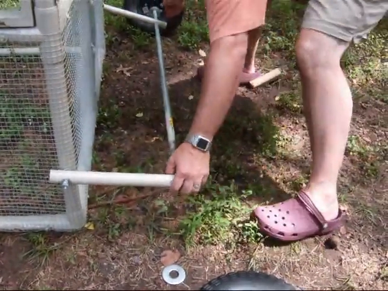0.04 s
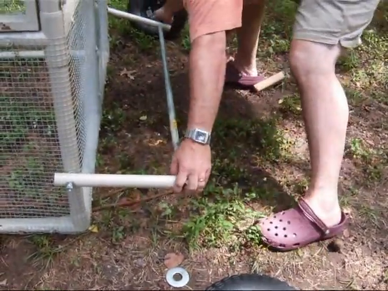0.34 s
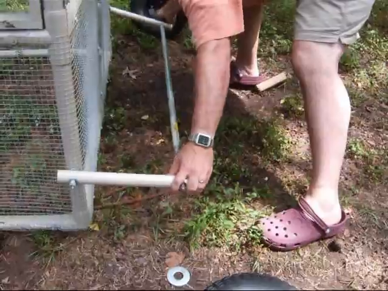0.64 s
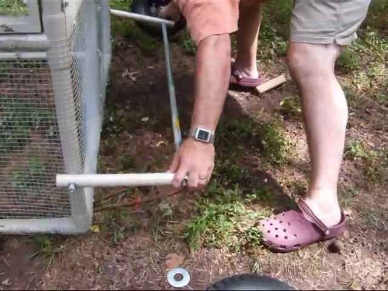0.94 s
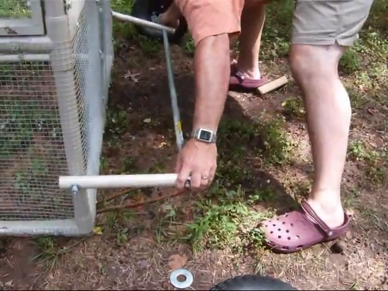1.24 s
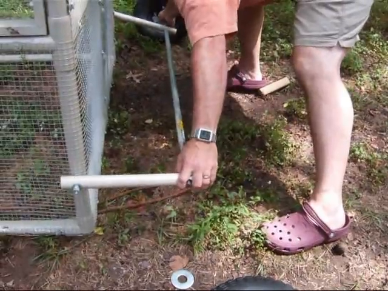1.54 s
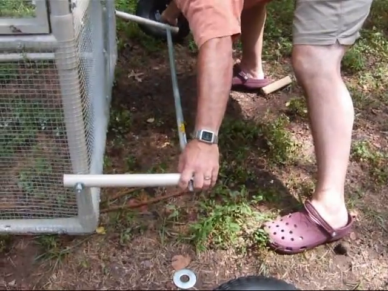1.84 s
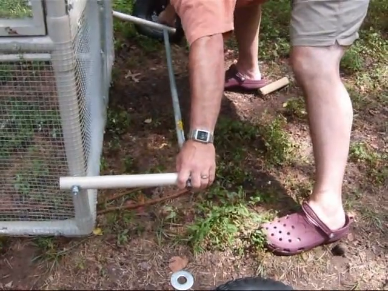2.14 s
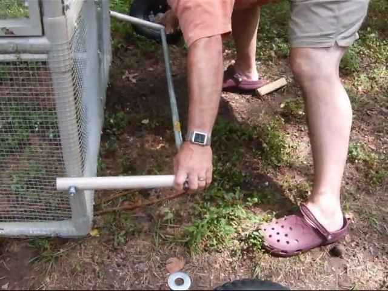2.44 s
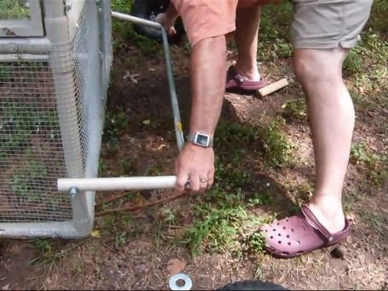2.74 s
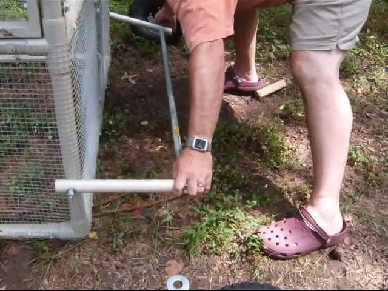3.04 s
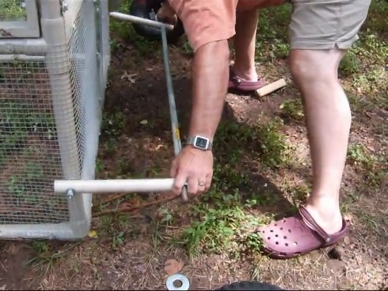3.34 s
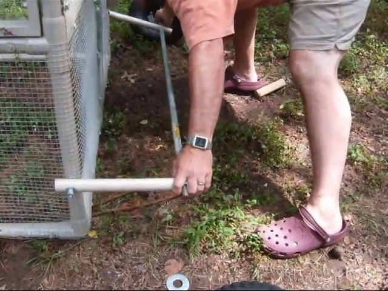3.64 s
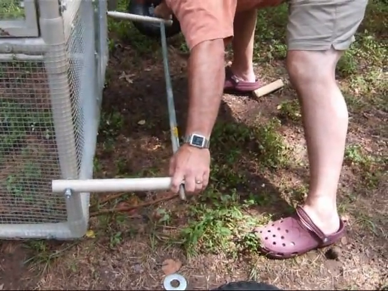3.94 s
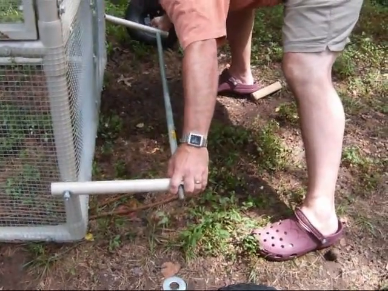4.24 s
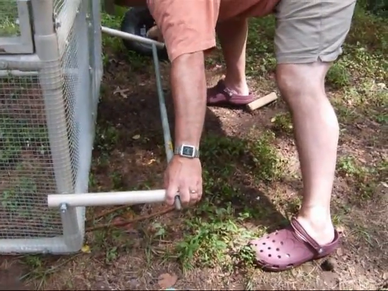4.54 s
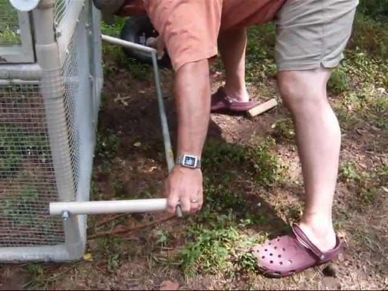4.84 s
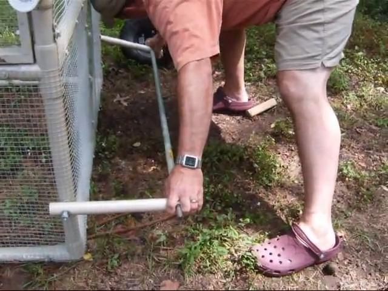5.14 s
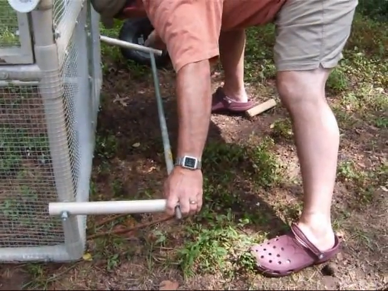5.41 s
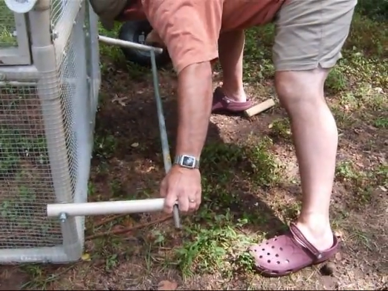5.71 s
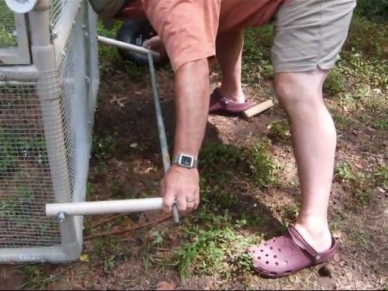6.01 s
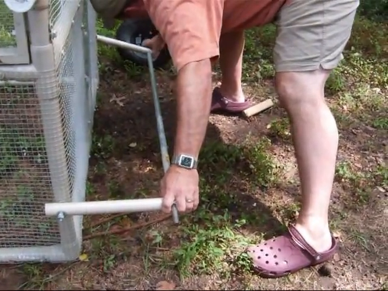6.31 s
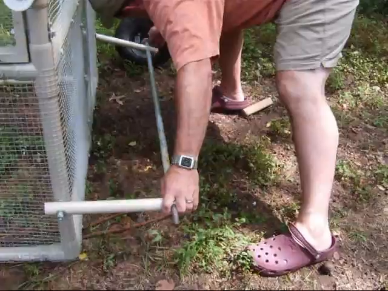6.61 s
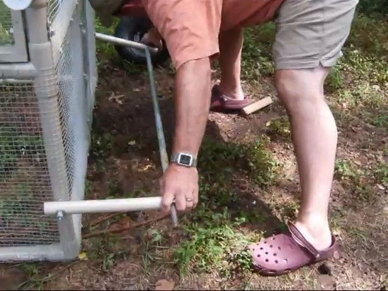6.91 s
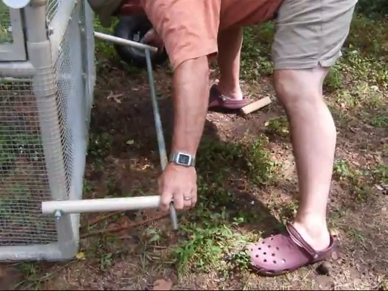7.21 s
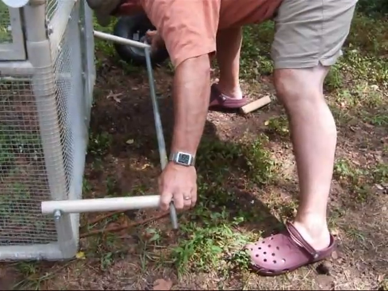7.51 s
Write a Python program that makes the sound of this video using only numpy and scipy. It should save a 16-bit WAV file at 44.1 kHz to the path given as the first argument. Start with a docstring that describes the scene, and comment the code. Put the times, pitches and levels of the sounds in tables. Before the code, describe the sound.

A metal rod slides through a plastic pipe in short pushes, heard in the foreground over a high chorus of cicadas in the trees. An early flurry of hollow knocks, sharp clicks and thin pings comes with low thumps and rattles from a wire-mesh frame. Scattered taps and grainy, high-pitched scraping follow, while one nearer, pulsing cicada gradually drops away and the distant hiss carries on.

```python
"""Outdoors, one microphone on a plastic pipe on a wire-mesh frame, cicadas in the trees around.
First a far chorus hisses and a nearer insect throbs. Half a second in, the frame stirs; then a steel
rod is worked by hand through the pipe. It rubs, knocks the wall and rings at one high note until the
next touch stops it, while the frame thumps and rattles. After two seconds the knocks come more
sparsely, and over the last three the near cicada fades away behind the rod."""
import sys
import numpy as np
from scipy.fft import rfft, irfft, next_fast_len
from scipy.io import wavfile
from scipy.ndimage import map_coordinates

SR = 44100
rng = np.random.default_rng(int(sys.argv[2]) if len(sys.argv) > 2 else 0)


def transcribe(u):
    """Save the signal u as a 16-bit wav file named by the first command-line argument.

    u: samples, shape (n,) or (channels, n), limited to [-1, 1]; the rate is SR.
    q: integer samples, one column per channel.
    """
    v = np.clip(np.atleast_2d(u).T, -1, 1)
    q = np.round(v * 32767).astype(np.int16)
    wavfile.write(sys.argv[1], SR, q)


N = 333479
TIME = np.arange(N) / SR
ROD_HZ = 4800  # the rod's one strong mode

# spectra of the open air and the far cicada chorus: f/Hz, relative level/dB
AIR_SPECTRUM = [(20, -4), (60, 6.5), (150, -1), (400, -5), (800, -1), (1400, -6.5), (2200, -8.5),
                (4000, -16), (8000, -23)]
CHORUS_SPECTRUM = [(1180, -41.5), (2000, -24), (2280, -19.5), (2460, -19), (3160, -13.5), (4110, -8.5),
                   (4240, -10.5), (4770, -2.5), (5150, -4.5), (6200, 1.5), (7110, -3.5), (7550, -5),
                   (7960, -14), (8300, -48), (10800, -57.5), (18300, -120)]
# spectra of the shaking mesh and the dragging rod: f/Hz, relative level/dB
MESH_SPECTRUM = [(30, -35), (85, -0.5), (130, -7.5), (230, -3), (400, 2), (600, -2.5), (850, 0.5),
                 (1400, -11.5), (2000, -4), (2800, -15), (4500, -6.5), (8000, -34)]
RUB_SPECTRUM = [(30, -38.5), (85, 1.5), (130, -8.5), (240, 0.5), (430, 4), (600, -4), (830, -4), (1100, -5),
                (1450, -12), (2000, -7.5), (3500, -23), (8000, -42.5)]
# resonances of the near cicada, frame, pipe edge and pipe: f/Hz, width/Hz, relative level/dB
CICADA_MODES = [(5610, 220, -9.5), (6210, 390, -2.5), (6833, 380, 1), (7110, 89, -2), (7307, 220, -8),
                (7700, 37, -15)]
FRAME_MODES = [(88, 30, -34.5), (190, 14, 1.5), (238.4, 39, 8), (395, 230, -20.5)]
EDGE_MODES = [(2160, 260, -6.5), (3770, 280, 3.5), (6470, 640, 8)]
PIPE_MODES = [(453, 160, -16.5), (790, 160, 4), (970, 82, -3.5), (1430, 110, -14.5), (1760, 160, -7),
              (2214, 220, -13), (2650, 38, -18.5), (3125, 55, -5), (3160, 64, -17)]
# cicadas in the trees: t/s, far chorus base level/dB, near insect base level/dB
CICADA_LEVELS = [(0, -30.7, -30), (2.4, -30.7, -31.3), (4.2, -29.7, -31.5), (5.3, -29.6, -34),
                 (6.2, -29.8, -39), (7.56, -32.2, -44)]
# the mesh shifts and rattles out: t/s, relative level/dB, bass t60/s
MESH_RATTLES = [(0.55, -34, 0.9), (0.791, -30.5, 0.66), (1.135, -26.5, 1), (1.432, -27.5, 0.36),
                (1.95, -33.5, 0.98), (2.208, -27, 0.68), (2.411, -31, 0.46), (2.62, -31.5, 0.3),
                (2.767, -27.5, 0.83), (5.137, -28, 0.84), (5.993, -28.5, 0.21), (6.484, -25.5, 0.6),
                (7.091, -30.5, 0.49)]
# the frame takes a push: t/s, peak level/dB
FRAME_THUMPS = [(0.759, -15), (1.053, -20.5), (1.125, -14.5), (1.733, -25), (1.935, -23.5), (2.784, -20.5),
                (2.836, -26), (3.321, -19), (4.527, -27), (7.176, -30.5)]
# the hand slides the rod along: t/s, length/s, relative rubbing level/dB, singing level/dB
ROD_PUSHES = [(0.718, 0.66, -35.5, -35), (1.794, 0.32, -40, -42), (2.96, 0.23, -74, -36),
              (3.39, 0.41, -42, -38), (3.895, .25, -48, -46), (4.155, 0.31, -44.5, -41.5),
              (4.58, 0.19, -41, -37), (5.727, .08, -40, -40), (5.993, 0.19, -49, -47.5),
              (6.5, 0.38, -66, -39.5), (7.016, 0.37, -44, -40.5)]
# hard edges catch and scrape: t/s, peak level/dB, t60/s, tilt/(dB per octave)
EDGE_CLICKS = [(0.784, -7, 0.08, 7), (0.9605, -5.5, .005, 5), (1.0052, -10.5, .004, 10),
               (1.142, -21, .07, -5.5), (1.154, -20, 0.0058, 19), (1.207, -8.5, 0.074, -6.5),
               (2.765, -4, 0.05, -3), (3.327, -19, 0.083, 18), (5.136, -16, 0.088, -5),
               (6.483, -13.5, 0.089, -5.5), (7.347, -17.5, 0.092, -5)]
# the rod meets the pipe wall: t/s, peak level/dB
PIPE_KNOCKS = [(0.707, -16), (0.765, -15), (0.786, -17.5), (0.846, -17.5), (0.917, -23.5), (0.96, -17),
               (1.054, -21.5), (1.129, -9), (1.153, -14.5), (1.617, -19), (1.735, -18.5), (1.94, -18.5),
               (1.968, -16), (2.013, -19), (3.325, -16.5), (3.601, -23.5), (4.111, -19), (4.16, -21),
               (4.383, -24.5), (4.705, -19.5), (4.818, -19), (5.633, -20), (5.713, -21), (6.041, -24.5),
               (6.758, -20.5), (6.942, -23.5), (7.035, -27), (7.537, -23.5)]
# the rod rings: t/s, relative level/dB, free time until the next touch/s
ROD_RINGS = [(0.805, -12, 0.016), (0.962, -14, 0.0069), (1.005, -15.5, 0.2), (1.135, -19, 0.033),
             (1.205, -18.5, 0.021), (1.332, -23.5, 0.3), (1.616, -15, .003), (1.742, -19, 0.029),
             (1.945, -18, 0.1), (2.768, -26, 0.058), (2.95, -15.5, 0.03), (3.33, -21, 0.15),
             (3.424, -21, 0.017), (3.629, -19, 0.068), (4.112, -18.5, 0.072), (4.388, -21, 0.037),
             (5.635, -10.5, .001), (5.714, -22, 0.035), (6.78, -31, 0.042), (6.943, -21.5, 0.014),
             (7.157, -24, 0.016), (7.52, -27.5, 0.02)]


def amp(db):
    """Decibels to gain."""
    return 10 ** (np.asarray(db) / 20)


def unit(x):
    """x at rms 1."""
    return x / np.sqrt(np.mean(x ** 2) + 1e-20)


def wobble(rate):
    """A smooth random curve, rate knots a second."""
    return map_coordinates(rng.standard_normal(2048), [TIME * rate], mode="wrap")


def filtered(x, response):
    """x through a frequency response."""
    size = next_fast_len(len(x) + 8192)
    return irfft(rfft(x, size) * response(np.fft.rfftfreq(size, 1 / SR)), size)[:len(x)]


def colour(points):
    """The response through (f/Hz, level/dB) points on a log axis."""
    f, db = np.transpose(points)
    return lambda hz: amp(np.interp(np.log(hz + 1), np.log(f), db))


def body(modes):
    """The causal response of a set of resonances."""
    return lambda f: sum(amp(db) * 1j * f * width / (hz * hz - f * f + 1j * f * width)
                         for hz, width, db in modes)


def noise(spectrum):
    """Noise of rms 1 with the given spectrum."""
    return unit(filtered(rng.standard_normal(N), colour(spectrum)))


def narrow_noise(hz, width_hz):
    """Noise of rms 1 in one steep resonance."""
    return unit(filtered(rng.standard_normal(N), lambda f: body([(hz, width_hz, 0)])(f) ** 2))


def grit(size, spread):
    """A stream of tiny contacts of unequal strength, rms 1."""
    contacts = rng.standard_normal(size)
    log_strength = spread * np.repeat(rng.standard_normal(size // 32 + 1), 32)[:size]
    return unit(contacts * np.exp(log_strength))


def add(track, s, sound):
    """Mix a sound into the track at time s."""
    start = round(s * SR)
    track[start:start + len(sound)] += sound[:N - start]


def stroke(s, length, rise_s=0.02, fade_db_per_s=100):
    """The gain of one push of the hand: it rises, holds and runs out."""
    rise = 1 - np.exp(-np.maximum(TIME - s, 0) / rise_s)
    return rise * amp(-fade_db_per_s * np.maximum(TIME - s - length, 0))


def scattered(x, latest_s=0.035, count=10):
    """Trunks and ground send weak late copies to the microphone, rippling the spectrum; rms 1."""
    delays = rng.uniform(0.003, latest_s, count)
    gains = 0.11 * rng.choice([-1, 1], count)
    return unit(x + sum(gain * np.roll(x, int(delay * SR)) for delay, gain in zip(delays, gains)))


def cicadas(throb_hz=7.79, trill_db=-28.5, trill_follows=0.52):
    """Far off in the trees a chorus hisses; nearer, one insect's body buzzes in throbs over a thin note."""
    times, far_levels, near_levels = np.transpose(CICADA_LEVELS)
    far_db, near_db = np.interp(TIME, times, far_levels), np.interp(TIME, times, near_levels)
    phase = 2 * np.pi * throb_hz * (TIME - 0.149)
    throb_db = -3 * (np.sin(phase) + 0.5 * np.sin(2 * phase)) - 0.5  # slow swell, quick drop
    band = lambda hz: (1 - 1 / (1 + (hz / 4500) ** 12)) / (1 + (hz / 7750) ** 50)
    buzz = filtered(rng.standard_normal(N), lambda hz: body(CICADA_MODES)(hz) * band(hz))
    near = scattered(buzz) * amp(near_db + throb_db + 0.49 * wobble(14))
    trill = narrow_noise(hz=4340, width_hz=170) * amp(trill_db + trill_follows * near_db + throb_db)
    far = scattered(noise(CHORUS_SPECTRUM)) * amp(far_db + 0.4 * wobble(12))
    return near + trill + far


def mesh_rattles(split_hz=750, treble_life=0.4, treble_rise_s=0.0058, bass_rise_s=0.0054):
    """Under the pipe the mesh shakes in fine contacts; its treble dies before its bass."""
    out, t = np.zeros(N), TIME[:SR * 3 // 4]
    for s, db, t60 in MESH_RATTLES:
        shake = unit(filtered(grit(len(t), spread=0.19), colour(MESH_SPECTRUM)))
        bass = filtered(shake, lambda hz: 1 / (1 + (hz / split_hz) ** 4))
        low = bass * amp(-60 * t / t60) * (1 - np.exp(-t / bass_rise_s))
        high = (shake - bass) * amp(-60 * t / (t60 * treble_life)) * (1 - np.exp(-t / treble_rise_s))
        add(out, s, amp(db) * (low + high))
    return out


def frame_thumps(push_s=0.00026, shudder_t60=0.07):
    """A soft push sets the frame's low modes going."""
    out, t = np.zeros(N), TIME[:SR // 4]
    for s, db in FRAME_THUMPS:
        push = t / push_s * np.exp(-t / push_s)
        shudder = 0.32 * rng.standard_normal(len(t)) * amp(-60 * t / shudder_t60)
        thump = filtered(push + shudder, body(FRAME_MODES))
        add(out, s + 0.0033, amp(db) * thump / np.abs(thump).max())
    return out


def pipe_rubbing(trim_db=-2, uneven_db=3.5, ticks_per_s=45, tick_db=-4, grip_s=0.55, grip_db=-52.5):
    """The rod drags unevenly along the pipe wall; bits of grit tick in the pipe."""
    friction = grit(N, spread=0.35) * amp(uneven_db * wobble(35))
    drag = unit(filtered(friction, colour(RUB_SPECTRUM)))
    hits = (rng.random(N) < ticks_per_s / SR) * rng.uniform(0.3, 1, N) * rng.choice([-1, 1], N)
    ticks = unit(filtered(hits, body(PIPE_MODES)))
    grip = amp(grip_db) * (TIME > grip_s)  # once held, the rod never quite rests
    pushes = sum(amp(db) * stroke(s, length) for s, length, db, _ in ROD_PUSHES)
    return np.hypot(grip, pushes) * amp(trim_db) * (drag + amp(tick_db) * ticks)


def rub_groan(peak_s=7.12, half_width_s=0.042, level_db=-33.5):
    """One short, rough low rub slides down in pitch."""
    hz = np.interp(TIME, [7.115, 7.145], [385, 310]) * (1 + 0.05 * wobble(150))
    envelope = amp(level_db + 2.1 * wobble(90)) * np.exp(-((TIME - peak_s) / half_width_s) ** 2)
    return envelope * np.sin(2 * np.pi * np.cumsum(hz) / SR)


def edge_clicks(pivot_hz=3500, top_hz=7500, direct=0.55, first_bite=6.7):
    """Steel bites the pipe's edge and scrapes on briefly."""
    out, t = np.zeros(N), TIME[:SR // 6]
    edge = lambda hz: (direct * hz / (hz + 900) + body(EDGE_MODES)(hz)) / (1 + (hz / top_hz) ** 30)
    for s, db, t60, tilt_db in EDGE_CLICKS:
        force = grit(len(t), spread=0.24) * amp(-60 * t / t60)
        force[0] = first_bite
        tilt = lambda hz: amp(tilt_db * np.log2(np.maximum(hz, 1500) / pivot_hz))
        click = filtered(force, lambda hz: tilt(hz) * edge(hz))
        add(out, s, amp(db) * click / np.abs(click).max())
    return out


def pipe_knocks(chatter_t60=0.093):
    """Each blow of the rod and the chatter after it ring the plastic pipe."""
    out, t = np.zeros(N), TIME[:SR // 4]
    for s, db in PIPE_KNOCKS:
        force = 0.12 * grit(len(t), spread=0.55) * amp(-60 * t / chatter_t60)
        force[0] += 1  # the blow itself
        # each spot on the wall favours other modes
        modes = [(hz, width, mode_db + rng.normal(0, 2.4)) for hz, width, mode_db in PIPE_MODES]
        knock = filtered(force, body(modes))
        add(out, s + 0.0014, amp(db) * knock / np.abs(knock).max())
    return out


def rod_singing():
    """While the rod slides, friction feeds its mode at random, so the note is grainy."""
    pushes = sum(amp(db) * stroke(s, length) for s, length, _, db in ROD_PUSHES)
    return narrow_noise(ROD_HZ, width_hz=30) * pushes


def rod_rings(free_t60=0.72, touch_t60=0.038, waver_db=1.4, trim_db=-1):
    """In the foreground the rod's mode swells, dies slowly, and is damped by the next touch."""
    out, t = np.zeros(N), TIME[:SR // 2]
    for s, db, free_s in ROD_RINGS:
        swell_s = 0.0012 + 0.046 * free_s
        fall_db = -60 * (t / free_t60 + np.maximum(t - free_s, 0) / (touch_t60 + free_s))
        envelope = amp(db + fall_db) * (1 - np.exp(-t / swell_s))
        # a tight contact stiffens the rod and cuts it short, so brief rings are sharper
        hz = ROD_HZ + rng.normal(0, 3.2) + 0.14 / (free_s + 0.003)
        add(out, s, envelope * np.sin(2 * np.pi * hz * t))
    return out * amp(trim_db + waver_db * wobble(79))


def scene():
    """Rod, pipe, frame and cicadas reach one microphone, over faint open air."""
    contacts = pipe_knocks() + frame_thumps() + edge_clicks() + mesh_rattles()
    friction = pipe_rubbing() + rub_groan()
    mono = contacts + friction + rod_rings() + rod_singing() + cicadas() + amp(-50) * noise(AIR_SPECTRUM)
    return np.array([mono, mono])


def record(dry):
    """The recorder keeps nothing above its band limit."""
    limit_hz, slope_width_hz = 8250, 300
    passband = lambda hz: np.clip((limit_hz - hz) / slope_width_hz, 0, 1)
    return np.array([filtered(channel, passband) for channel in dry])


dry = scene()
out = record(dry)
transcribe(out)
```